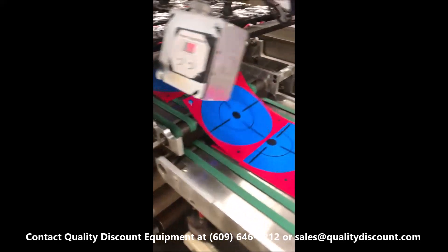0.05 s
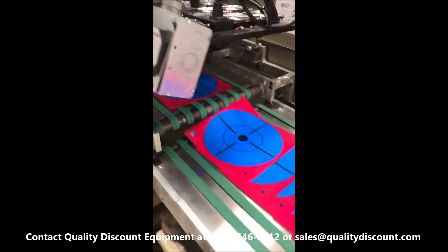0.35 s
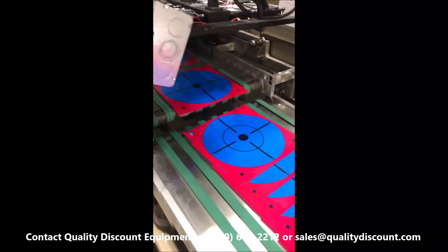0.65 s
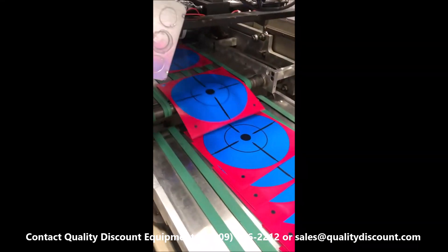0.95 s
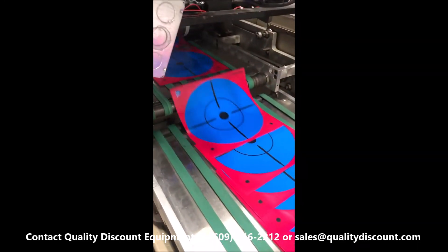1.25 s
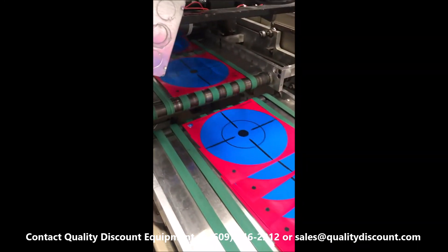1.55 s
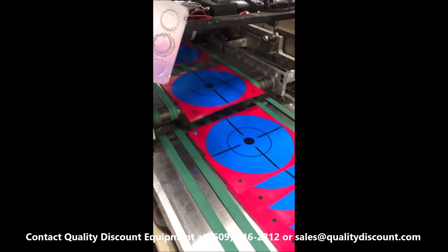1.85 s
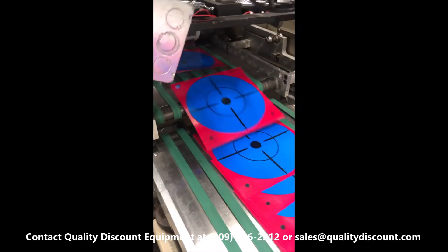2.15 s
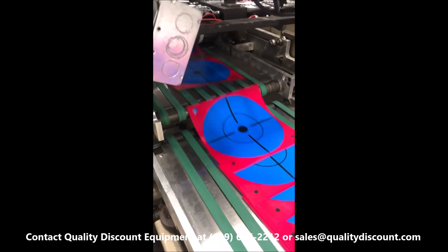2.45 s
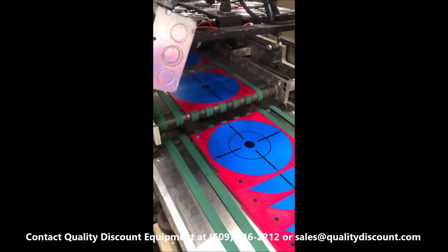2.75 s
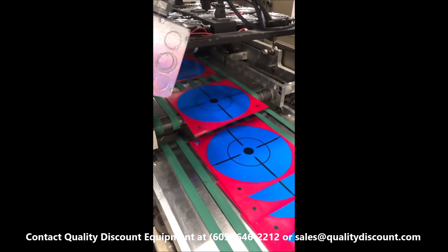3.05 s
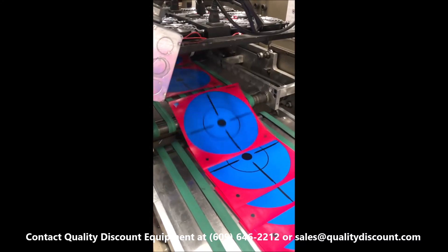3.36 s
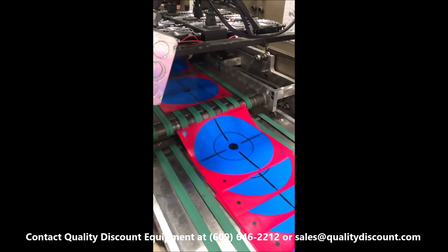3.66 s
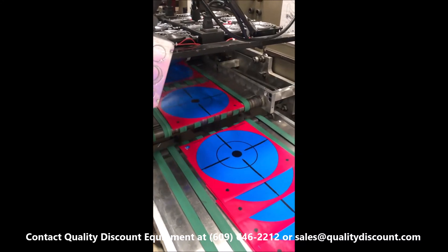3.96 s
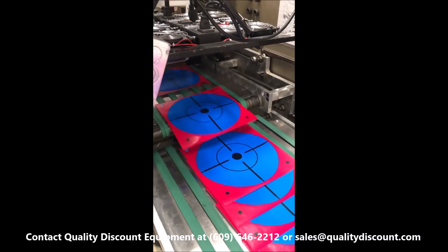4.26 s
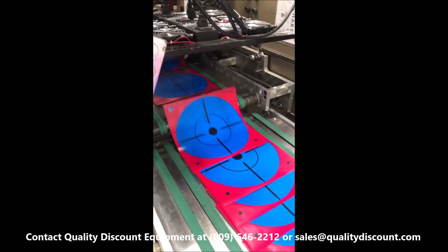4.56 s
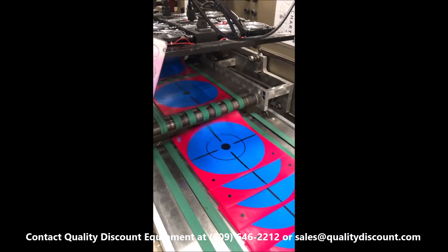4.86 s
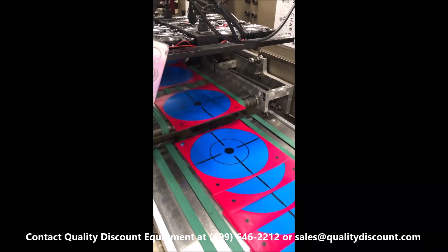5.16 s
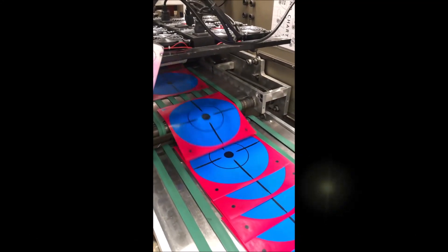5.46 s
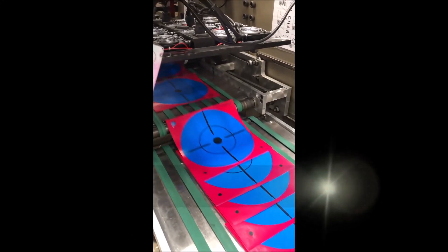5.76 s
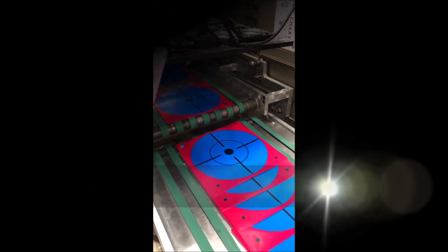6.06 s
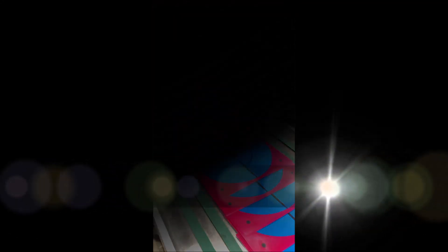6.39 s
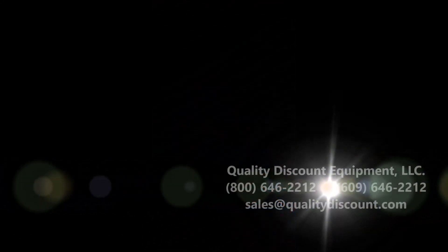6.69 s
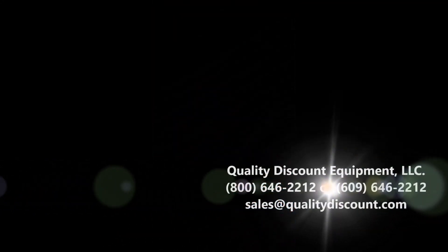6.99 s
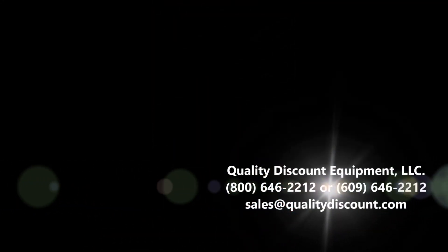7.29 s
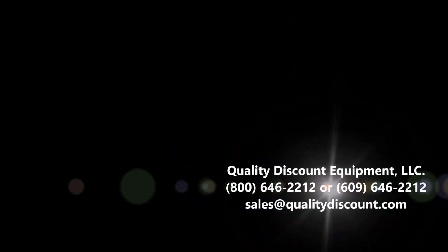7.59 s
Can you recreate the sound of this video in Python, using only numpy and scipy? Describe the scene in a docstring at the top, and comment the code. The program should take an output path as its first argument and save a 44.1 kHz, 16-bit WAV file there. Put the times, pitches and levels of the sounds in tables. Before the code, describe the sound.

A large sheet-fed printing press is already running at steady speed in a factory hall, heard in mono from just above its delivery belts. A low drive rumble, a loud blower roar and a slightly throbbing motor hum continue throughout. Over them, air jets hiss steadily, with thin, high whistles that swell and fade. A lever makes a quick double clack about every 1.1 seconds, near 0.7, 1.9, 3.0, 4.1, 5.2 and 6.3 seconds. Short, dull thumps from the machine body come irregularly, around 0.7, 1.1 and 1.6 seconds, twice near 4 seconds, most strongly at 5.7, and again at 6.3. A sheet edge ticks lightly against a guide at about 4.1 and 5.2 seconds. The overall level stays even until the sound cuts off abruptly at about 6.9 seconds.

```python
"""Sheet-fed printing press

A press runs at steady speed in a factory hall, heard in mono above its delivery belts.
The drive rumbles and thumps, blowers roar and hum, air jets hiss, and their thin edge tones swell
and fade. A lever clacks twice per sheet; now and then a sheet ticks against a guide.
The sound cuts off near the end."""
import sys
import numpy as np
from scipy.fft import rfft, irfft, next_fast_len
from scipy.io import wavfile
from scipy.ndimage import map_coordinates

SR = 44100
rng = np.random.default_rng(int(sys.argv[2]) if len(sys.argv) > 2 else 0)


def wrap_up_sound(samples):
    """Save the sound to the file named by the first command line argument, as 16-bit audio."""
    columns = np.atleast_2d(samples).T
    # keep every value between -1 and 1, then stretch to whole-number steps
    tamed = np.clip(columns, -1, 1)
    steps = np.round(tamed * 32767).astype(np.int16)
    wavfile.write(sys.argv[1], SR, steps)


N = 336483


def amp(db):
    """Decibels to gain."""
    return 10 ** (np.asarray(db) / 20)


def unit(x):
    """Scale to rms 1."""
    return x / np.sqrt(np.mean(x ** 2) + 1e-20)


def clock():
    """Sample times in s."""
    return np.arange(N) / SR


def curves(rows):
    """One value per sample for each column after the time."""
    times_s, *columns = np.transpose(rows)
    return [np.interp(clock(), times_s, column) for column in columns]


def shape(points, hz):
    """Gain of (f/Hz, level/dB) points joined on a log axis."""
    points_hz, db = np.transpose(points)
    return amp(np.interp(np.log(hz + 1), np.log(points_hz), db))


def bell(hz, centre_hz, width_hz):
    """Power response of one resonance."""
    return 1 / (1 + (2 * (hz - centre_hz) / width_hz) ** 2)


def wobble(rate_hz):
    """Smooth random curve, rate_hz knots a second."""
    knots = rng.standard_normal(1024)
    coarse_s = clock()[::64]
    return np.interp(clock(), coarse_s, map_coordinates(knots, [coarse_s * rate_hz], mode="wrap"))


def wavering(level_db, depth_db, rate_hz):
    """Gain wandering around a level."""
    return amp(level_db + depth_db * wobble(rate_hz))


def filtered(x, response):
    """Apply a frequency response to x."""
    size = next_fast_len(N + SR // 4, True)
    return irfft(rfft(x, size) * response(np.fft.rfftfreq(size, 1 / SR)), size)[:N]


def noise(response):
    """Coloured noise, rms 1."""
    return unit(filtered(rng.standard_normal(N), response))


def tone(hz, stray_hz, flutter_db, rate_hz):
    """Sine with wandering pitch and level, rms 1."""
    cycles = np.cumsum(hz + stray_hz * wobble(rate_hz)) / SR + rng.random()
    return unit(np.sin(2 * np.pi * cycles) * wavering(0, flutter_db, rate_hz))


# Drive spectrum: f/Hz, relative density/dB
RUMBLE_SPECTRUM = [(20, -34), (35, -28), (48, -17), (58, -8.5), (78, -1.5), (94, -2.5), (108, -9),
                   (122, -10.5), (140, -18), (220, -64)]
# Blower spectrum: f/Hz, relative density/dB
ROAR_SPECTRUM = [(80, -51), (120, -8.5), (142, 2), (180, -2), (215, -1.5), (255, -6), (290, 1), (320, -10),
                 (355, -3), (385, -12), (440, -30.5), (800, -60)]
# Slow swells: t/s, rumble level/dB, roar level/dB
MACHINE_LEVELS = [(0, -32.5, -31.5), (.7, -37.5, -29), (1.15, -34, -29), (1.7, -36, -30), (2.3, -36, -29.5),
                  (3.4, -37, -29), (4.05, -36, -28.5), (4.7, -35, -29.5), (5.7, -35.5, -29),
                  (6.3, -37, -30.5), (6.8, -32.5, -29.5)]

def drive_and_blowers():
    """Gears and cylinders shake the frame; turbulence roars in the blower housings."""
    rumble_db, roar_db = curves(MACHINE_LEVELS)
    rumble = wavering(rumble_db, depth_db=1.1, rate_hz=9) * noise(lambda hz: shape(RUMBLE_SPECTRUM, hz))
    roar = wavering(roar_db, depth_db=.6, rate_hz=7.4) * noise(lambda hz: shape(ROAR_SPECTRUM, hz))
    return rumble + roar


# Duct spectrum: f/Hz, relative density/dB
DUCT_SPECTRUM = [(250, -43.5), (400, -0.5), (480, 0.5), (550, -1), (700, 0), (770, -5.5), (900, -5),
                 (1100, -4.5), (1250, -8.5), (1480, -7.5), (1900, -15), (3000, -49.5)]
# Duct modes: f/Hz, width/Hz, lift/dB
DUCT_RESONANCES = [(421.5, 14, 6), (482, 18, 6), (531, 16, 2), (589.6, 14, 5.5), (684, 43, 3.5)]
# Duct swells: t/s, level/dB
DUCT_LEVELS = [(0, -31), (1.3, -31.3), (2, -31), (3.1, -31.5), (4.3, -31.5), (5.2, -31), (5.7, -31.5),
               (6.3, -31), (6.8, -30.5)]

def ducts():
    """Turbulent air rings in the ducts."""
    def response(hz):
        lift_db = sum(db * bell(hz, mode_hz, width_hz) for mode_hz, width_hz, db in DUCT_RESONANCES)
        return shape(DUCT_SPECTRUM, hz) * amp(lift_db)
    return wavering(curves(DUCT_LEVELS)[0], depth_db=.94, rate_hz=12) * noise(response)


# Blower and motor tones: f/Hz, level/dB
HUM_TONES = [(58.4, -45), (120, -47), (177.9, -41), (197.8, -48), (462.2, -46.5), (464.1, -46),
             (477.3, -49), (530.8, -53), (681.5, -52), (800.9, -56), (924.3, -54.5), (928.3, -57),
             (932.4, -50.5), (934, -56), (1392.5, -55), (1398.6, -53), (1473, -54), (1711, -57),
             (1874.7, -55.5), (2098, -61), (2495, -63), (2889, -62), (2908, -60)]
# Main motor drone: t/s, level/dB
DRONE_LEVELS = [(0, -36.5), (1.1, -35), (2.1, -37.5), (3.2, -35.3), (4.8, -34), (6.2, -34.3), (6.8, -32.5)]

def motors():
    """Close tones of blowers and motors beat; the main motor drones at four times mains frequency."""
    speed_jitter, mains_hz = .0005, 60
    hum = sum(amp(db) * tone(hz, hz * speed_jitter, flutter_db=-.2, rate_hz=4) for hz, db in HUM_TONES)
    drone = tone(4 * mains_hz, stray_hz=.02, flutter_db=.3, rate_hz=4)
    return hum + amp(curves(DRONE_LEVELS)[0]) * drone


# Twin blower blade tones: f/Hz, level/dB
BLADE_TONES = [(353.6, -42.8), (355.7, -41.8)]

def blower_throb():
    """Two blowers at nearly equal speeds beat against each other."""
    first_peak_s = .124
    t = clock() - first_peak_s
    return sum(amp(db) * unit(np.cos(2 * np.pi * hz * t)) for hz, db in BLADE_TONES)


# Narrow jet resonances: f/Hz, width/Hz, relative level/dB
NOZZLE_MODES = [(4020, 90, -54.5), (4110, 70, -52.5), (4425, 55, -53), (4735, 60, -53.5), (4944, 35, -57),
                (5054, 30, -55.5), (5285, 50, -53.5), (5394, 22, -49.5), (5435, 50, -53), (5486, 45, -49.5),
                (5620, 100, -49), (5706, 18, -52.5), (5820, 70, -50), (5910, 60, -50), (5970, 40, -53),
                (6019, 12, -50.5), (6457, 30, -58), (6565, 60, -53), (6643, 10, -52), (7175, 110, -50.5),
                (7285, 65, -52.5), (8003, 50, -51), (8215, 90, -54.5), (9539, 30, -58.5), (9762, 45, -55),
                (9854, 50, -57), (10120, 150, -53), (10340, 90, -49.5), (10443, 55, -52),
                (10510, 35, -56.5), (10780, 150, -55), (11010, 50, -56), (11119, 60, -56.5)]

def nozzle_song(jets):
    """Turbulence excites narrow resonances; each jet swells and fades on its own."""
    out = np.zeros(N)
    for jet in range(jets):
        modes = NOZZLE_MODES[jet::jets]
        def power(hz):
            return sum(amp(db) ** 2 / width_hz * bell(hz, mode_hz, width_hz) ** 2
                       for mode_hz, width_hz, db in modes)
        song = noise(lambda hz: np.sqrt(power(hz)))
        rms = np.linalg.norm([amp(db) for _, _, db in modes])
        out += rms * unit(song * wavering(0, depth_db=1.2, rate_hz=2.8))
    return out


# Jet spectrum: f/Hz, relative density/dB
HISS_SPECTRUM = [(700, -29.5), (1400, -2.5), (2000, 1), (3200, 1), (4000, 2.5), (5200, 2), (6100, 2),
                 (6800, 1), (9200, 0), (10500, -0.5), (13000, -3), (14200, -5.5), (15200, 1.5),
                 (16000, -11)]
# Jet rasp: t/s, level re hiss/dB
RASP_LEVELS = [(0, -10), (.7, -11.5), (1.3, -9), (2.4, -11), (3.3, -9.5), (4.1, -10.5), (5.3, -10.5),
               (6.8, -11)]

def air_jets():
    """Air blown under the sheets hisses, rasps and sings."""
    hiss_db, song_trim_db = -31.5, 2.5
    flutter = wavering(0, depth_db=.4, rate_hz=40)
    hiss = noise(lambda hz: shape(HISS_SPECTRUM, hz))
    rasp_gain = wavering(curves(RASP_LEVELS)[0], depth_db=1, rate_hz=10)
    rasp = rasp_gain * noise(lambda hz: bell(hz, 3632, width_hz=280))
    return flutter * (amp(hiss_db) * (hiss + rasp) + amp(song_trim_db) * nozzle_song(jets=7))


# Jet whistles: peak t/s, 1/e half-length/s, f/Hz, level/dB
EDGE_TONES = [(.6, .5, 5394, -47), (.65, .4, 5486, -48), (.8, .4, 6643, -47.5), (1, .6, 10352, -51),
              (1.1, .4, 7300, -51), (1.6, .6, 11005, -54), (2.5, .45, 7300, -46), (2.8, .5, 5490, -46),
              (3.4, .5, 6643, -52), (3.6, .7, 5394, -45), (3.9, .4, 8008, -49), (4.2, .8, 8877, -50),
              (4.2, .5, 6019, -49.5), (4.7, .45, 6643, -45.5), (4.7, .7, 5706, -50.5),
              (5.8, 1.3, 4124, -52), (5.9, .6, 6019, -51), (6, .9, 6643, -46.5), (6.2, 1, 10349, -47)]

def whistles():
    """A jet locks into a thin, fluttering edge tone for a while."""
    out = np.zeros(N)
    for peak_s, half_s, hz, db in EDGE_TONES:
        swell = np.exp(-((clock() - peak_s) / half_s) ** 2)
        out += amp(db) * swell * tone(hz, stray_hz=1.5, flutter_db=1, rate_hz=8)
    return out


# Frame thumps: t/s, level/dB, f/Hz, T60/s
FRAME_THUMPS = [(.683, -22.5, 482, .08), (1.139, -20, 165, .06), (1.6, -21, 190, .06),
                (1.612, -27, 670, 0.2), (3.909, -23, 165, .06), (4.026, -18.5, 165, 0.065),
                (5.696, -15.5, 140, 0.057), (6.32, -20.5, 169.6, 0.054)]

def thumps():
    """The drive jolts the frame, which rings briefly and dully."""
    out = np.zeros(N)
    t = np.arange(SR // 8) / SR
    for start_s, db, hz, t60_s in FRAME_THUMPS:
        ring = amp(db - 60 * t / t60_s) * np.sin(2 * np.pi * hz * t)
        out[round(start_s * SR):][:len(t)] += ring
    return out


# Lever strokes and returns: t/s, level/dB, f/Hz
LEVER_HITS = [(.7438, -21, 1092), (.8283, -23.5, 1038), (1.8516, -20.5, 1044), (1.9358, -20, 1071),
              (2.9507, -23, 1087), (2.9588, -18.5, 1087), (3.0439, -21.5, 1065), (4.0684, -24, 968),
              (4.1513, -20, 1108), (5.1775, -22, 1012), (5.2625, -18.5, 1076), (6.29, -22, 1065),
              (6.3734, -22.5, 1001)]

def lever_clacks():
    """A lever rubs into contact and strikes its damped stop: a short knock with a faint tick."""
    rise_s, t60_s, scrape_s = .002, .028, .025
    scrape_db, tick_db = -15.5, -21.5  # re knock
    knocks, scrape_env, tick_env = np.zeros((3, N))
    for hit_s, db, hz in LEVER_HITS:
        t = clock() - hit_s
        near = np.abs(t) < .15
        t = t[near]
        rise = np.exp(-(t / rise_s) ** 2)
        decay = amp(-60 * np.abs(t) / t60_s)
        knock_env = amp(db) * np.where(t < 0, rise, decay)
        knocks[near] += knock_env * np.sin(2 * np.pi * (hz * t + rng.random()))
        scrape_env[near] += amp(db + scrape_db) * np.exp(-np.abs(t) / scrape_s)
        tick_env[near] += amp(tick_db) * knock_env
    scrapes = scrape_env * noise(lambda hz: bell(hz, 930, width_hz=570))
    ticks = tick_env * noise(lambda hz: bell(hz, 2300, width_hz=1100))
    return knocks + scrapes + ticks


# Sheet flicks: t/s, level/dB
SHEET_FLICKS = [(4.068, -28), (5.177, -31)]

def sheet_flicks():
    """The edge of a sheet ticks against a guide."""
    half_s = .004
    bursts = sum(amp(db) * np.exp(-np.abs(clock() - peak_s) / half_s) for peak_s, db in SHEET_FLICKS)
    return bursts * noise(lambda hz: bell(hz, 2700, width_hz=1800))


def scene():
    """The whole press, alike in both channels."""
    steady = drive_and_blowers() + ducts() + motors() + blower_throb() + air_jets()
    press = steady + whistles() + thumps() + lever_clacks() + sheet_flicks()
    return np.array([press, press])


def record(dry):
    """Abrupt cut-off, then a steep low-pass."""
    stop_s, fade_s = 6.858, .024
    cutoff_hz, transition_hz = 15740, 60
    gate = np.clip((stop_s - clock()) / fade_s, 0, 1)
    lowpass = lambda hz: np.clip((cutoff_hz - hz) / transition_hz + .5, 0, 1)
    return np.array([filtered(channel * gate, lowpass) for channel in dry])


dry = scene()
out = record(dry)
wrap_up_sound(out)
```